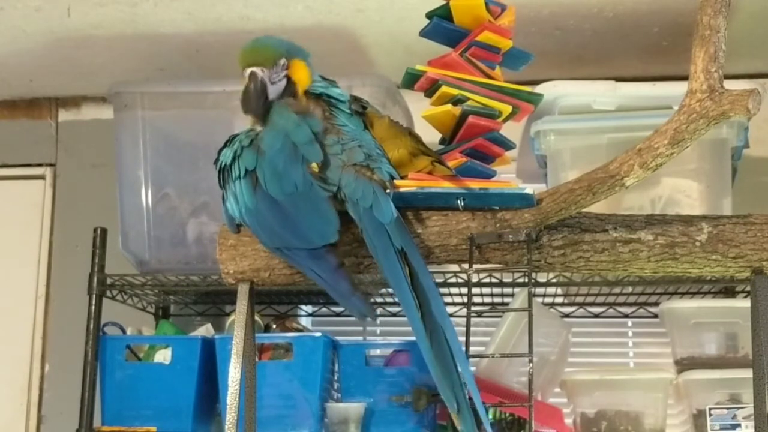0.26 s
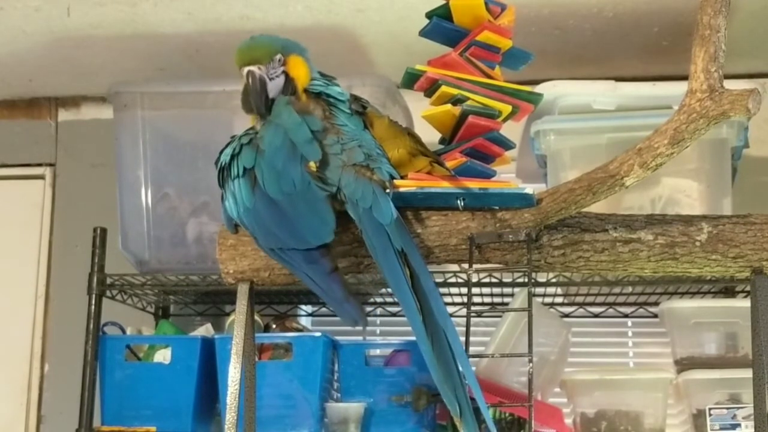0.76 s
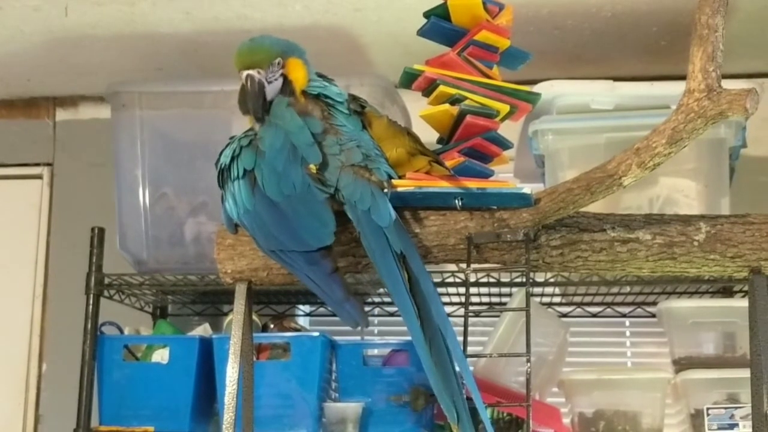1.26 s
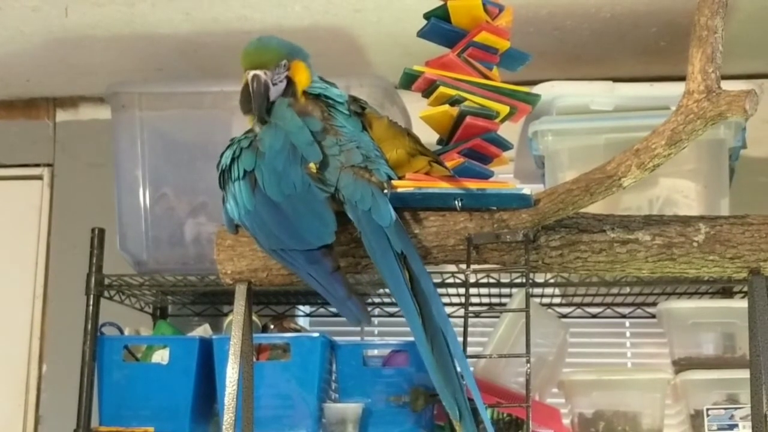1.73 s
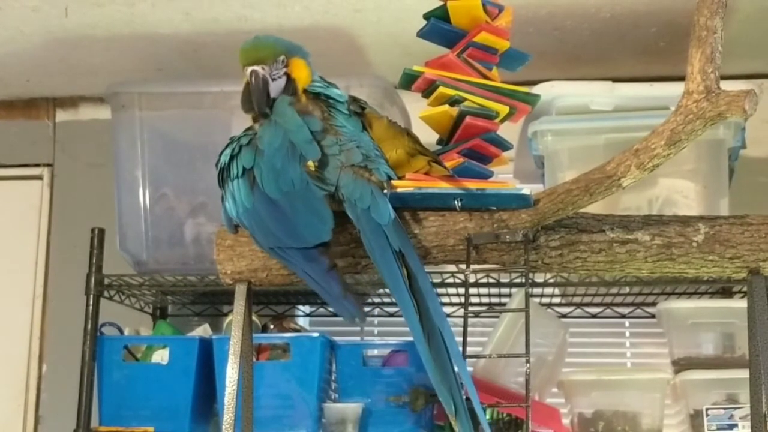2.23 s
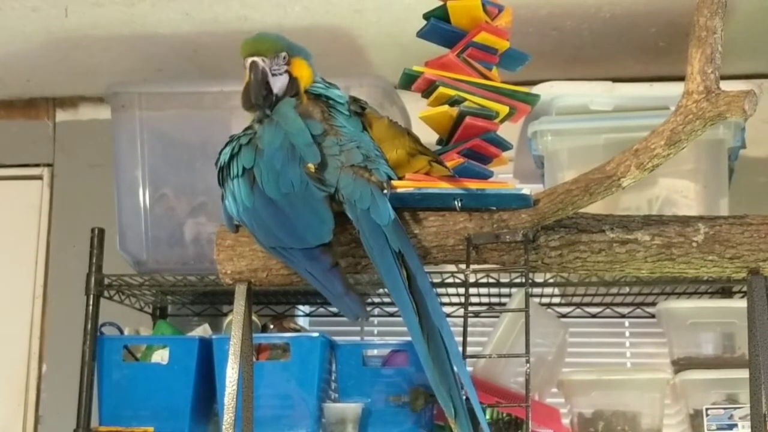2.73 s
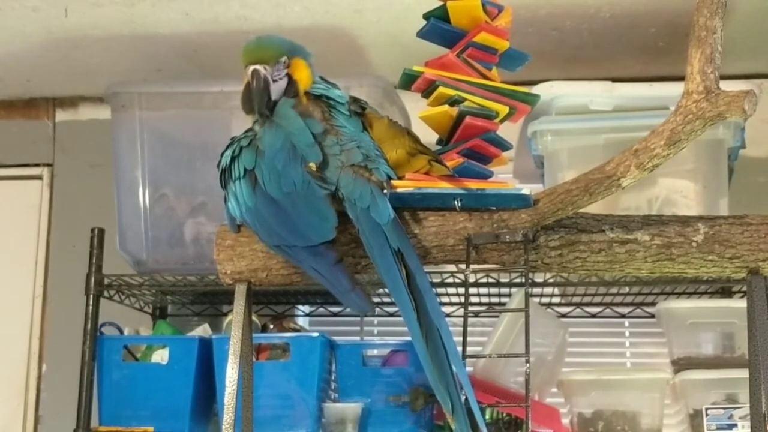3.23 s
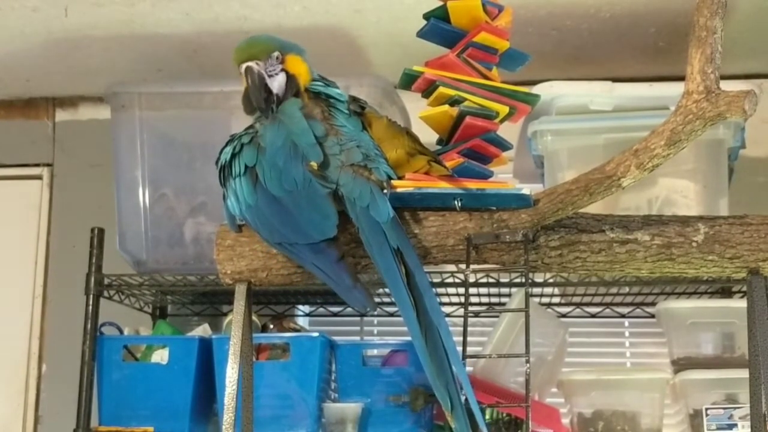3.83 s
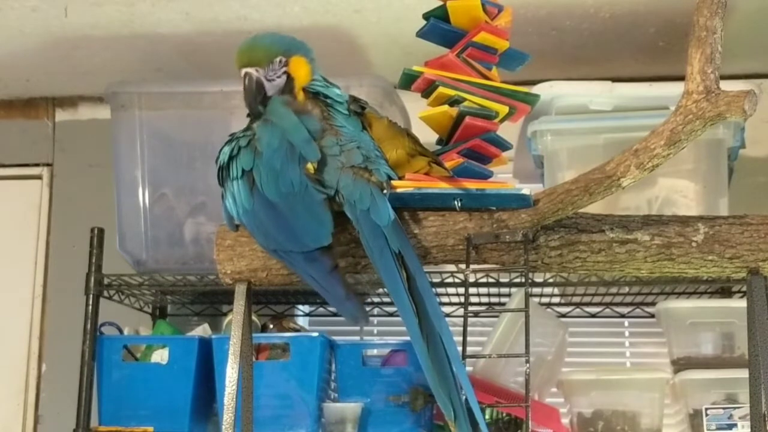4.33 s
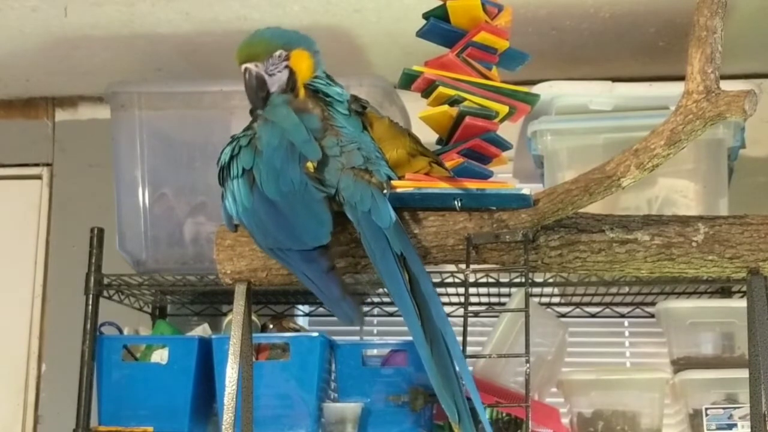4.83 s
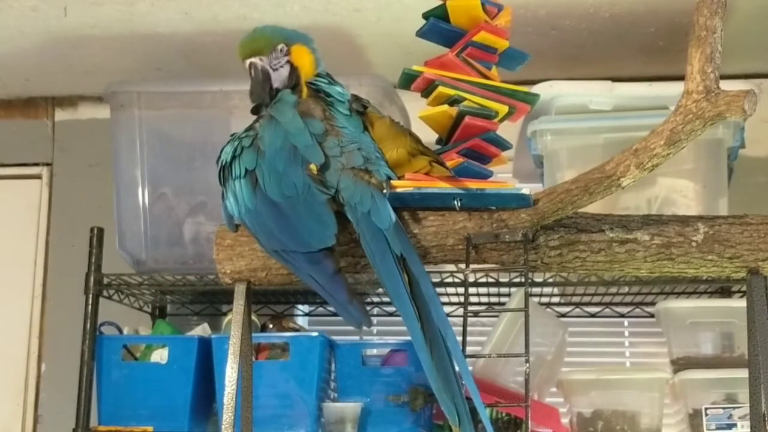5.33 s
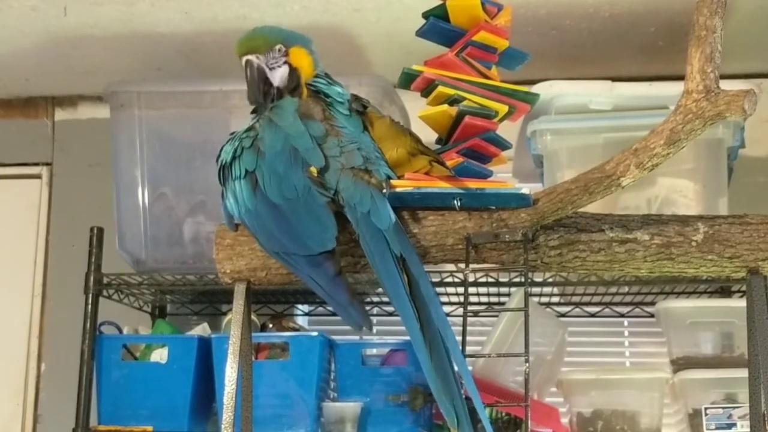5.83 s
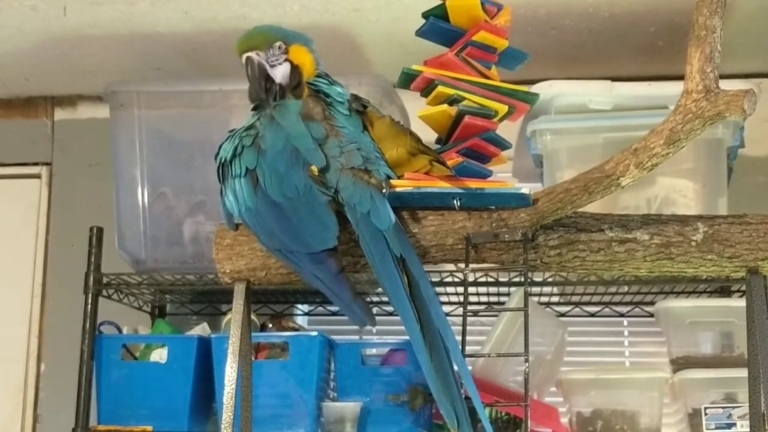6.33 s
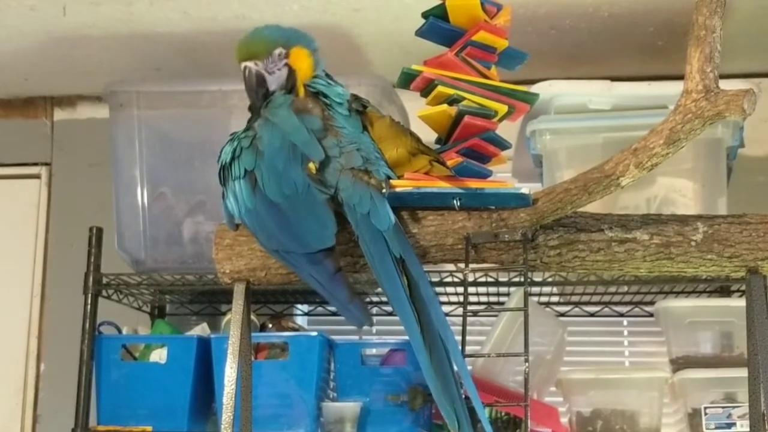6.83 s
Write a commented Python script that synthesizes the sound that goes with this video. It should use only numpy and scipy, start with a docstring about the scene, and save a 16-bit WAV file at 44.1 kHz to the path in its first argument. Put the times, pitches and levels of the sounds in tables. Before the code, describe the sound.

A macaw gives three harsh squawks and two thin shrieks with chirps, close by in a small room over a faint fan hum.

```python
"""In a small room with a humming fan, a macaw calls close to the microphone.
It gives two thin double shrieks, each followed by a chirp, and three harsh squawks that clear as they
fade. Its voice box buzzes or whistles, turning rough when pushed; throat and beak shape the tone.
Between the calls, beaks, claws and feathers tick and rustle faintly.
A limiter holds down the loudest calls."""
import sys
import numpy as np
from scipy import signal
from scipy.fft import rfft, irfft, next_fast_len
from scipy.io import wavfile
from scipy.ndimage import uniform_filter1d, minimum_filter1d, map_coordinates

SR = 44100
rng = np.random.default_rng(int(sys.argv[2]) if len(sys.argv) > 2 else 0)


def wav_record(signal):
    """Record a signal, one row per channel, as 16-bit PCM in the file named by sys.argv[1]."""
    frames = np.transpose(np.atleast_2d(signal))
    bounded = np.clip(frames, -1, 1)
    # unit amplitude maps onto the largest positive 16-bit level
    quanta = np.round(bounded * 32767).astype(np.int16)
    wavfile.write(sys.argv[1], SR, quanta)


N = 311787

# Levels in the tables are relative. Roughness runs from about 0 (clean) to about 1 (harsh).
# hum of the fan and the mains: f/Hz, level/dB
HUM_TONES = [(59.2, -72), (177.6, -58.5), (209.9, -76), (290.7, -65), (538.3, -66.5), (662.1, -70.5),
             (1007, -76)]
# tone colour of the fan's moving air: f/Hz, level/dB
AIR_COLOUR = [(15, -45.5), (25, -20), (110, -14.5), (183, -6), (240, -5.5), (305, -7.5), (433, -15),
              (537, -5.5), (848, -12), (1240, -12), (2010, -20), (3000, -20), (3340, -22.5), (6380, -24.5),
              (15500, -39)]
# how long the room's echo takes to fall by 60 dB: f/Hz, t/s
ECHO_TIMES = [(300, 0.25), (2500, 0.23), (6000, 0.19), (13000, 0.15)]
# tone colour of feathers barely stirring: f/Hz, level/dB
STIR_COLOUR = [(1200, -24), (2800, 0), (4500, -2), (7500, 1.5), (9000, -11), (15000, -19.5)]
# short feather rustles: start t/s, length t/s, level/dB
RUSTLE_EVENTS = [(0.229, 0.093, -50), (1.869, 0.018, -52.5), (3.008, 0.068, -49), (4.945, 0.068, -50.5),
                 (5.242, 0.1, -47)]
# tone colour of those rustles: f/Hz, level/dB
RUSTLE_COLOUR = [(590, -43), (1000, -19), (1360, -6.5), (1680, -15), (1760, -8), (4460, -6), (15000, -25.5)]
# the clearest ticks of beak and claws: t/s, level/dB, ring f/Hz
TICK_EVENTS = [(1.4784, -34.5, 3780), (1.5519, -35.5, 6300), (1.6514, -38, 5860), (1.7272, -32, 3060),
               (1.869, -36.5, 3930), (2.158, -35.5, 2980), (2.2176, -36.5, 6500), (2.3268, -32, 6200),
               (2.9307, -35.5, 8140), (2.9926, -28, 6000), (3.0265, -33, 6720), (3.5741, -31, 7380),
               (4.777, -33.5, 5400), (4.8543, -33.5, 3454), (4.9571, -38, 3070), (5.0235, -33.5, 2780),
               (6.1143, -39.5, 6340), (6.212, -37, 6680), (6.5358, -31, 6430)]
# the faint ticks ring near one of these pitches: f/Hz
FAINT_TICK_PITCHES = [3300, 5160, 6700]
# soft knocks on the perches: t/s, level/dB, ring f/Hz
KNOCK_EVENTS = [(3.194, -32.5, 1032), (4.637, -36.5, 1078), (5.119, -38, 1220), (5.365, -40.5, 1040)]
# the steps of a shriek, a jump between whistle and screech, before stretching:
# end t/s, from f/Hz, to f/Hz, from level/dB, to level/dB, roughness
SHRIEK_STEPS = [(.011, 4315, 4557, -22, -12.5, .08), (.026, 4658, 4732, -12.5, -7, .6),
                (.056, 6576, 6388, -5.5, -1.5, .06), (.0865, 5444, 5320, -10.5, -13.5, .9),
                (.0995, 4860, 4940, -13.5, -14, .18), (.117, 4440, 4416, -13, -8, .3),
                (.1435, 6497, 6380, -3, -5, .07), (.178, 5500, 5030, -7, -20.5, .9)]
# the steps of a chirp (lead-in, push, squeak, screech, low tail): same columns
CHIRP_STEPS = [(.015, 5400, 5350, -18, -9, .06), (.022, 5350, 5630, -3, 3, .25),
               (.030, 7100, 7170, -8, -9, .2), (.049, 5000, 4300, -14, -19, .9),
               (.064, 3680, 3740, -16, -27, .15)]
# the shrieks: start t/s, level/dB, stretch factor
SHRIEK_EVENTS = [(.643, 1, 0.96), (4.207, 0.5, 0.95)]
# the chirps: start t/s, level/dB, stretch factor
CHIRP_EVENTS = [(.880, 0.5, 1), (4.443, 1.5, 1.02)]
# how throat and open beak colour the shrieks and chirps: f/Hz, level/dB
WHISTLE_COLOUR = [(1000, -28.5), (3100, -14.5), (3600, -10), (4400, -6.5), (6500, -8), (6950, -17),
                  (7250, -4.5), (7800, 4.5), (9300, -1.5), (11000, -12.5), (13000, -1.5), (14000, -11),
                  (15500, -13.5)]
# how they colour the squawks: f/Hz, level/dB
BUZZ_COLOUR = [(500, -13), (1150, -14.5), (1550, -17), (2250, 0), (2800, 2), (3100, -14.5), (3450, -3.5),
               (3950, -7.5), (4250, -13), (4600, -6), (5700, -6), (7900, -15), (8900, -28.5), (10400, -28),
               (15500, -48)]
# the squawks: start t/s, upward scoop t/s, harsh for t/s, clears over t/s, held for t/s, base f/Hz,
# pitch sag/(Hz/s), level/dB, change on clearing/dB, first harmonic/dB, dip of the second/dB,
# boost of the fourth and fifth/dB, opening roughness, extra closing roughness
SQUAWK_EVENTS = [(1.085, 0.026, 0.13, 0.044, 0.25, 1193, 608, -10, -7.5, 0.5, -18.5, -1, 1.03, 0.16),
                 (2.491, 0.029, .12, .06, 0.25, 1178, 384, -8, -4, -1.5, 3, 2, 1.1, .6),
                 (6.658, .036, .08, .14, 0.29, 1153, 291, -6.5, -5.5, -1, -15.5, 0, .95, .3)]


def amp(db):
    """Turn decibels into a gain."""
    return 10 ** (np.asarray(db) / 20)


def unit(x):
    """Scale x to an average strength (rms) of 1."""
    return x / np.sqrt(np.mean(x ** 2) + 1e-20)


def along(points, hz):
    """Read between the rows of a (frequency, value) table on a log frequency axis."""
    freqs, values = np.transpose(points)
    return np.interp(np.log(hz + 1), np.log(freqs + 1), values)


def wobble(t, rate):
    """A smooth random curve through `rate` new values a second."""
    position = (t - t[0]) * rate
    return map_coordinates(rng.standard_normal(len(t) + 4), [position + 1])


def coloured(x, colour):
    """Make each frequency of x louder or softer, as the colour table says."""
    size = next_fast_len(len(x) + 2048)
    gain = amp(along(colour, np.fft.rfftfreq(size, 1 / SR)))
    return irfft(rfft(x, size) * gain, size)[:len(x)]


def add(track, start_s, x):
    """Mix x into the track at start_s."""
    part = track[round(start_s * SR):][:len(x)]
    part += x[:len(part)]


def ramp(t, start, length):
    """0 before start, then rising evenly to 1 over length."""
    return np.clip((t - start) / length, 0, 1)


def gate(t):
    """Open and shut a call without a click."""
    return np.clip(np.minimum(t, t[-1] - t) / .0009, 0, 1)


def fan(air_db=-52.5, waver=.28):
    """The fan hums a little unsteadily over an even rush of air."""
    t = np.arange(N) / SR
    hum = sum(amp(db) * np.sqrt(2) * np.sin(2 * np.pi * hz * t + waver * wobble(t, 1.3))
              for hz, db in HUM_TONES)
    return hum + amp(air_db) * unit(coloured(rng.standard_normal(N), AIR_COLOUR))


def room(x, delay_s=.002):
    """The near walls echo almost at once; the high notes die first."""
    hz, t, noise = signal.stft(rng.standard_normal(SR // 2), SR, nperseg=256)
    decay = amp(-60 * t / along(ECHO_TIMES, hz)[:, None])
    tail = signal.istft(noise * decay, SR, nperseg=256)[1]
    tail = np.pad(tail / np.linalg.norm(tail), (round(delay_s * SR), 0))
    return signal.fftconvolve(x, tail)[:N]


def stirring_feathers(level_db=-66, swell_db=4, swell_hz=14):
    """The feathers are never quite still: a faint rustle comes and goes."""
    swell = amp(swell_db * wobble(np.arange(N) / SR, swell_hz))
    return amp(level_db) * unit(swell * coloured(rng.standard_normal(N), STIR_COLOUR))


def rustle(length_s):
    """Feathers move: grainy noise swells and fades."""
    t = np.arange(0, length_s, 1 / SR)
    grains = rng.standard_normal(len(t)) * amp(5.2 * wobble(t, 170))
    swell = np.sqrt(np.abs(np.sin(np.pi * t / length_s)))
    return unit(coloured(grains, RUSTLE_COLOUR)) * swell


def tap(hz, fade_s, octaves, side_db=-16, rise_s=.0011):
    """One small hit: a dying burst of noise, strongest at hz and weaker to either side."""
    t = np.arange(SR // 5) / SR
    ring = [(100, side_db - 16.5), (hz / 2 ** octaves, side_db), (hz, 0),
            (hz * 2 ** octaves, side_db), (16000, side_db - 15.5)]
    burst = unit(coloured(rng.standard_normal(len(t)), ring))
    return burst * amp(-60 * t / fade_s) * (1 - np.exp(-t / rise_s))


def fidgeting(tick_gain_db=-5, knock_gain_db=-9, faint_db=-53, spread_db=8, faint_count=190):
    """Beak and claws tick, perches are knocked and feathers rustle, amid many fainter ticks."""
    out = np.zeros(N)
    for start_s, db, hz in TICK_EVENTS:
        add(out, start_s, amp(db + tick_gain_db) * tap(hz, fade_s=.04, octaves=.3))
    for start_s, db, hz in KNOCK_EVENTS:
        add(out, start_s, amp(db + knock_gain_db) * tap(hz, fade_s=.12, octaves=.46, side_db=-20))
    for k, (when, size, pick, detune) in enumerate(rng.random((faint_count, 4))):
        start_s = (k + when) / faint_count * N / SR
        hz = FAINT_TICK_PITCHES[int(pick * len(FAINT_TICK_PITCHES))] * 2 ** (.59 * (detune - .5))
        add(out, start_s, amp(faint_db + spread_db * size) * tap(hz, fade_s=.055, octaves=.36))
    for start_s, length_s, db in RUSTLE_EVENTS:
        add(out, start_s, amp(db) * rustle(length_s))
    return out


def whistle(t, hz, rough, jitter=.16, jitter_hz=1700, floor_hz=4050, under_db=-33, under_gap_hz=3900):
    """A piercing whistle; when rough, its pitch flips up and down at random and it screeches."""
    flipping_hz = hz * (1 + jitter * rough * np.tanh(2 * wobble(t, jitter_hz)))
    pitch = np.maximum(flipping_hz, np.minimum(hz, floor_hz))
    phase = 2 * np.pi * np.cumsum(pitch) / SR
    tone = np.sin(phase) + amp(-20 + 5 * rough) * np.sin(2 * phase) + amp(-32) * np.sin(3 * phase)
    breath = .11 * rough * rng.standard_normal(len(t))
    flicker = amp(3 * (rough + .96) * wobble(t, 1200))
    # a faint, fuzzy tone follows a set distance below the whistle
    undertone = amp(under_db) * np.sin(phase - 2 * np.pi * under_gap_hz * t + .5 * wobble(t, 500))
    return unit(coloured(tone * flicker + breath, WHISTLE_COLOUR)) + undertone


def high_call(steps, stretch, jump_s=.0015):
    """A shriek or chirp: the whistle slides within each step, then jumps quickly to the next."""
    until, from_hz, to_hz, from_db, to_db, rough = np.transpose(steps)
    ends = stretch * until
    starts = np.append(0, ends[:-1])
    corners = np.column_stack([starts + jump_s / 2, ends - jump_s / 2]).ravel()
    t = np.arange(0, ends[-1], 1 / SR)
    slide = lambda first, last: np.interp(t, corners, np.column_stack([first, last]).ravel())
    return gate(t) * amp(slide(from_db, to_db)) * whistle(t, slide(from_hz, to_hz), slide(rough, rough))


def buzz(t, hz, rough, first_db, second_db, bite_db, flutter_hz=75, jitter_hz=720):
    """The voice box buzzes; pushed hard, its pitch flutters wildly and the overtones smear."""
    flutter = np.sin(2 * np.pi * np.cumsum(flutter_hz * (1 + .2 * wobble(t, 100))) / SR)
    jitter = np.tanh(2 * wobble(t, jitter_hz))
    pitch = hz * (1 + rough * (.045 * flutter + .064 * jitter))
    phase = 2 * np.pi * np.cumsum(pitch) / SR
    # the lowest harmonic comes forward as the voice clears, the high ones as it roughens
    mellow_db, rasp_db = 5 * (1 - rough), 2 * rough
    harmonics_db = [first_db + mellow_db, second_db, 0] + [rasp_db + bite_db] * 2 + [rasp_db] * 8
    tone = sum(amp(db) * np.sin(k * phase + k * k) for k, db in enumerate(harmonics_db, 1))
    # a puff of air escapes once a cycle
    breath = .11 * (rough + .2) * (1 + np.cos(phase)) * rng.standard_normal(len(t))
    flicker = amp(rough * (2 * wobble(t, 500) - 2.5 * flutter))
    return unit(coloured((tone + breath) * flicker, BUZZ_COLOUR))


def squawk(scoop_s, harsh_s, clearing_s, held_s, base_hz, sag, level_db, clear_db,
           first_db, dip_db, bite_db, harsh, closing):
    """The bird pushes hard, then relaxes: roughness, pitch and level fall together."""
    attack_s, catch_s, release_s = .01, .022, .078
    relaxed_roughness, push_hz, scoop_hz, catch_hz = .11, 96.2, 340.3, 60
    t = np.arange(0, held_s + release_s, 1 / SR)
    scoop = np.exp(-(t / scoop_s) ** 2)  # the call starts low and slides up
    relaxed = ramp(t, harsh_s, clearing_s)
    catch = ramp(t, held_s, catch_s)  # at the end the voice catches: weaker, higher and rougher
    rough = harsh + (relaxed_roughness - harsh) * relaxed + closing * catch
    sag_hz = sag * np.clip(t - harsh_s, 0, held_s - harsh_s)
    hz = base_hz + push_hz * rough - scoop_hz * scoop - sag_hz + catch_hz * closing * catch
    attack_db = -35.5 * np.exp(-t / attack_s)
    release_db = -23.5 * ramp(t, held_s, release_s) ** 2
    db = level_db + attack_db + clear_db * relaxed - 9 * catch + release_db
    # the second harmonic carries the scoop, then briefly dips or lifts once the voice has cleared
    dip = np.exp(-((t - harsh_s - clearing_s - .01) / .025) ** 2)
    second_db = -3 + 5 * relaxed + 15.5 * scoop + dip_db * dip
    return gate(t) * amp(db) * buzz(t, hz, rough, first_db, second_db, bite_db)


def macaw():
    """The bird's squawks, shrieks and chirps, each at its moment."""
    out = np.zeros(N)
    for start_s, *shape in SQUAWK_EVENTS:
        add(out, start_s, squawk(*shape))
    for steps, events in (SHRIEK_STEPS, SHRIEK_EVENTS), (CHIRP_STEPS, CHIRP_EVENTS):
        for start_s, db, stretch in events:
            add(out, start_s, amp(db) * high_call(steps, stretch))
    return out


def scene(call_db=-1, call_echo_db=-5, movement_echo_db=-2):
    """One microphone hears the fan, the room and the bird; both channels are the same."""
    calls = amp(call_db) * macaw()
    movements = fidgeting() + stirring_feathers()
    echo = room(amp(call_echo_db) * calls + amp(movement_echo_db) * movements)
    mono = fan() + echo + movements + calls
    return np.array([mono, mono])


def record(dry, ceiling=1.05, peak=.92, top_hz=15750):
    """A fast limiter turns loud calls down, the last peaks are rounded off, the top treble is cut."""
    needed_gain = np.minimum(1, ceiling / (np.abs(dry[0]) + 1e-9))
    smooth_gain = uniform_filter1d(minimum_filter1d(needed_gain, size=103), size=129)
    held = signal.resample_poly(dry * smooth_gain, 2, 1, axis=1)  # double rate for cleaner rounding
    rounded = held / (1 + np.abs(held / peak) ** 14) ** (1 / 14)
    limited = signal.resample_poly(rounded, 1, 2, axis=1)
    size = next_fast_len(N + 4096)
    kept_band = np.fft.rfftfreq(size, 1 / SR) < top_hz
    return irfft(rfft(limited, size) * kept_band, size)[:, :N]


dry = scene()
out = record(dry)
wav_record(out)
```